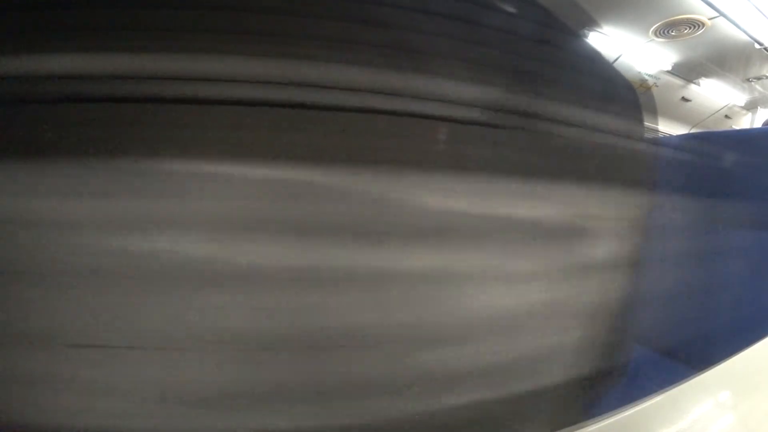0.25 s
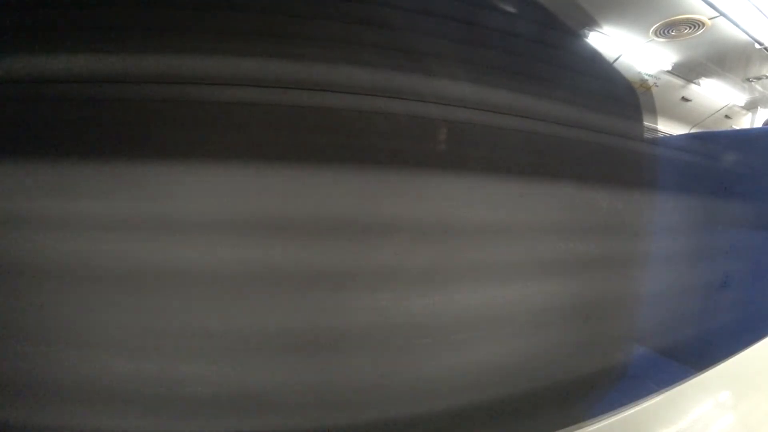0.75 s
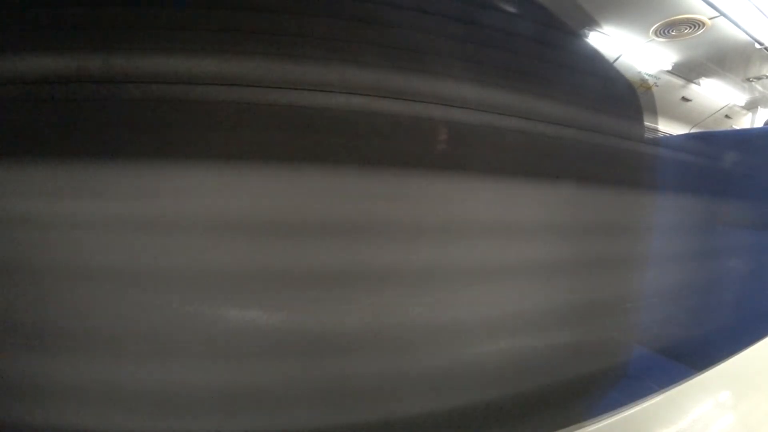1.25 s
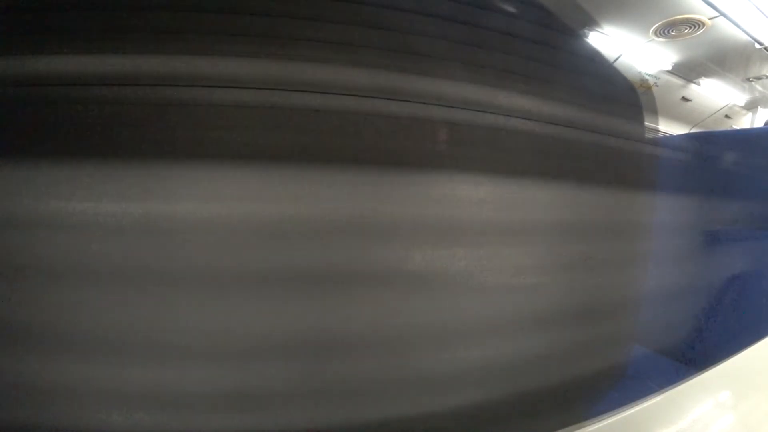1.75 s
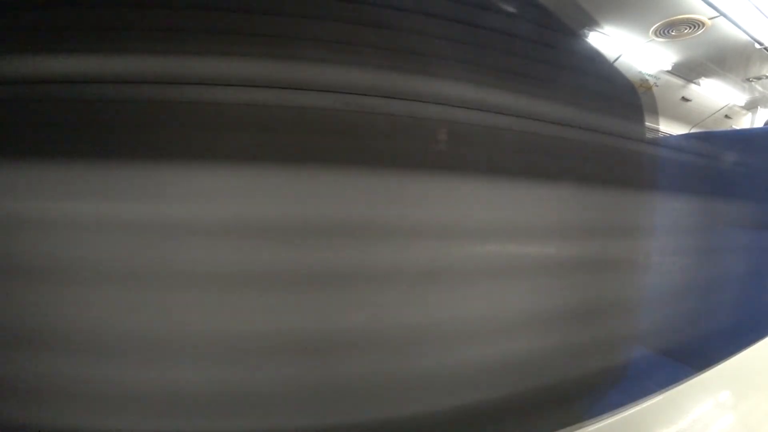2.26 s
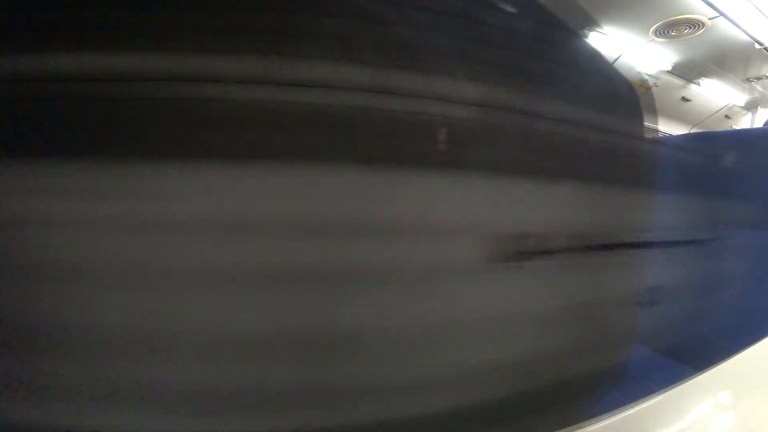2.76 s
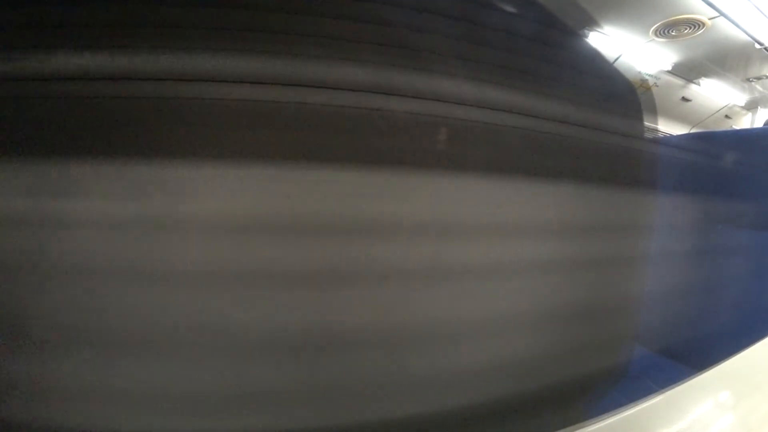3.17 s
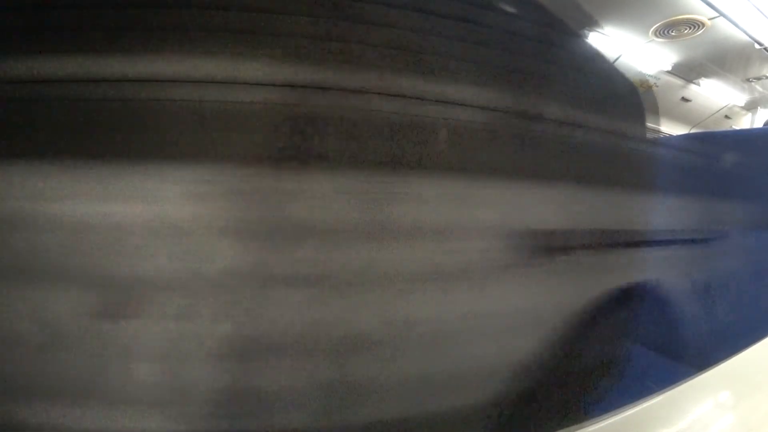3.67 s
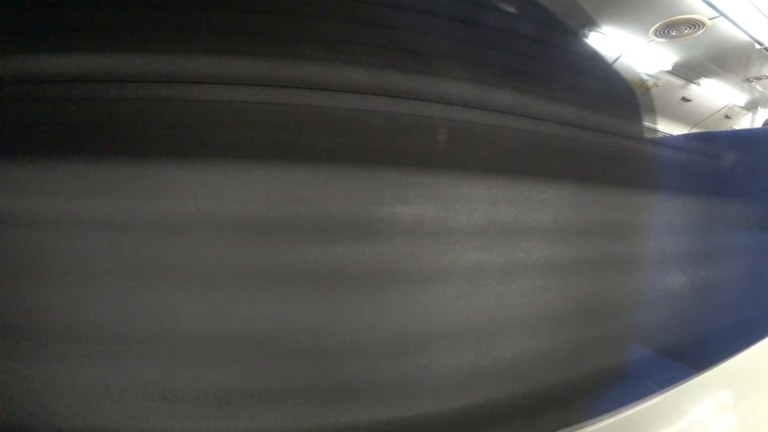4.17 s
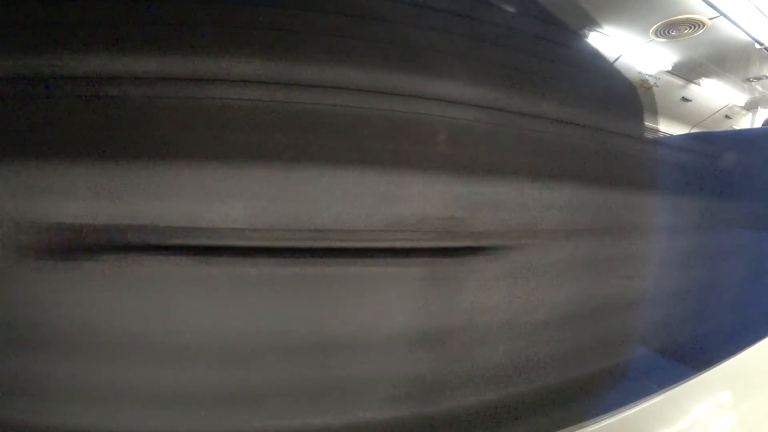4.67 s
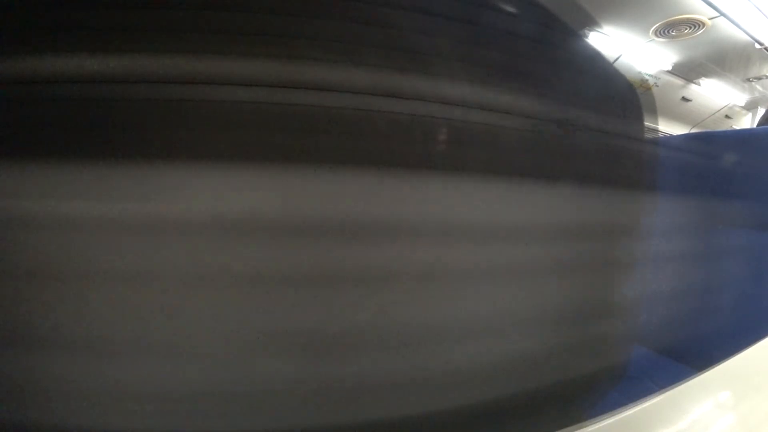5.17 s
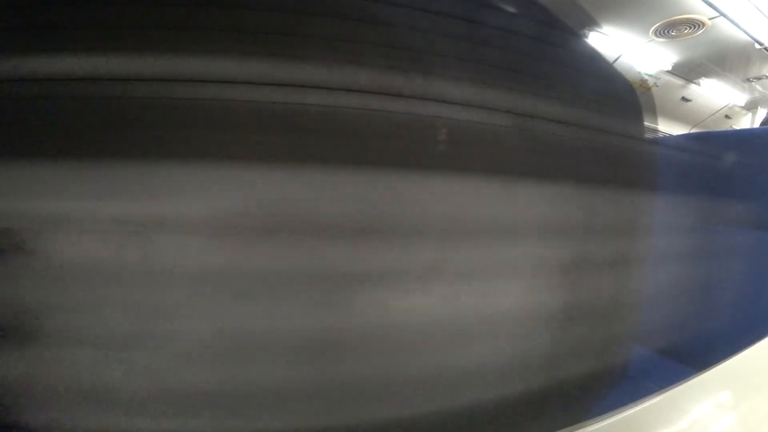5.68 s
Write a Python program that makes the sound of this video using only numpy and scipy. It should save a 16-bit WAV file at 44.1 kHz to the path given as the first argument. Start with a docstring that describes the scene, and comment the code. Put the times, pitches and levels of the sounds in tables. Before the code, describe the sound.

Steady railcar cabin noise beside a window as the tunnel wall rushes past: very low uneven heaving, boomy cabin air, a low engine hum, and broad rushing wheel noise. A thin metallic gear whine fades in and out, shifting between left and right. Faint hiss and a barely perceptible whistle lie above, all continuous from start to finish.

```python
"""Diesel railcar in a tunnel

Inside a railcar that slowly gains speed: a six-cylinder engine drones under the floor as a stack of sines,
and gears whine as sines with shaft sidebands. The turbocharger's faint whistle is a narrow band of noise.
Shaped noise makes the car body's heave and boom, the wheels' roar that comes back off the tunnel wall through
the window, the air hiss and brief flickers of treble. Two microphones close together pick it all up."""
import sys
import numpy as np
from scipy import signal
from scipy.fft import rfft, irfft, next_fast_len
from scipy.io import wavfile
from scipy.ndimage import uniform_filter1d

SR = 44100
rng = np.random.default_rng(int(sys.argv[2]) if len(sys.argv) > 2 else 0)


def wav_out(sig):
    """Save sig, one row per channel (or a flat mono array), as 16-bit PCM at SR to the path in sys.argv[1]."""
    wavfile.write(sys.argv[1], SR, np.round(np.clip(np.atleast_2d(sig).T, -1, 1) * 32767).astype(np.int16))


N = 261513  # length in samples

# Engine cycles a second, one cycle being two crank turns: start_s, cycle_hz
ENGINE_CYCLE = [(0, 15.445), (5.93, 15.69)]
# Engine lines, levels at mid-scene; the sixth multiple is the firing rate:
# multiple of the cycle, left_db, right_db, drift_db_per_s
ENGINE_ORDERS = [(4, -42, -41, -.3), (5, -38, -38, .3), (6, -28, -29, -.3), (7, -49, -50, 2),
                 (9, -44, -46, 2), (10, -49, -52, -.5), (11, -44, -49, 1.9), (12, -42, -41, .7),
                 (13, -51, -54, .4), (14, -43, -47, .4), (15, -50, -49, .3), (17, -55, -50, -1.2),
                 (18, -64, -52, -1.2), (21, -52, -59, .8), (22, -55, -53, .6), (23, -59, -51, 1.3),
                 (24, -66, -54, .5), (25, -51, -49, -.7), (26, -50, -50, 3.3), (28, -56, -51, 1.2),
                 (32, -59, -54, .7), (33, -56, -54, 1.1), (35, -47, -57, -.1), (36, -62, -50, 1.4),
                 (37, -55, -50, .2), (38, -51, -54, -.6), (42, -56, -52, 1.6), (44, -56, -57, 2.1),
                 (45, -62, -55, 0), (60, -61, -56, -.8)]
# Phase by which the left leads on engine lines; low ones arrive together: line_hz, lead_rad
ENGINE_LEAD = [(100, 0), (140, -.9), (520, -.8), (540, -2.6)]

# Driveline tones, pitch at the starting speed and levels at mid-scene:
# pitch_hz, left_db, right_db, sideband_db (against the tone), drift_db_per_s, left_lead_rad
GEAR_TONES = [(34.4, -31, -30, -60, 0, 0), (220, -52, -47, -60, .6, -1.7), (311.5, -45, -50, -60, -.8, 0),
              (439.7, -63, -52, -60, -1, -2.9), (1088.3, -59, -49, -10, .3, 2.4),
              (1133.6, -62, -57, -60, 1, -3), (1482.6, -57, -56, -16, .3, .8),
              (1523.6, -56, -56, -11, .4, -1.5), (2176.6, -57, -54, -8, .3, 2)]
# The loudest gear mesh fades in and out at each microphone: start_s, left_db, right_db
WHINE_LEVELS = [(0, -49, -48), (.45, -60, -43), (.9, -52, -41), (1.4, -48, -38), (1.8, -52, -47.5),
                (2.35, -45.5, -48), (2.75, -43.5, -67), (3.15, -47.5, -46.5), (3.7, -46.5, -45),
                (4.0, -43, -50), (4.5, -48, -49), (4.85, -48, -49), (5.45, -64, -47), (5.93, -50, -41)]
SHAFT_HZ, WHINE_HZ = 34.4, 1770.6  # drive shaft turns a second and loudest mesh, at the starting speed
# the left's lead on the whine at the start, and its growth per second of starting-speed running
WHINE_LEAD_RAD, WHINE_TURN_RAD_PER_S = -4.5, 1.17

# Compressor whistle: start_s, pitch_hz
TURBO_PITCH = [(0, 10480), (5.93, 10570)]
TURBO_DB, TURBO_FADES_DB_PER_S = -66.5, 0.5  # level at the start and its slow fall
FLUTTER_HZ = 80  # corner of the noise that spreads the whistle

# Heave of the car body: start_s, level_db
HEAVE_LEVEL = [(0, -18), (.3, -19), (.6, -17), (.9, -18), (1.35, -24), (1.6, -14), (2.05, -18.5),
               (2.55, -15), (2.95, -19), (3.5, -13), (3.9, -20), (4.45, -20), (5.05, -16.5), (5.2, -16),
               (5.45, -16), (5.93, -16.5)]
# Body bending and suspension resonances: centre_hz, width_hz, relative level_db
HEAVE_MODES = [(8, 4, 0), (14, 4, -3), (20.7, 4, 2), (28, 6, -5.5)]
# Relative spectrum of the cabin boom: freq_hz, level_db (per Hz)
BOOM_SPECTRUM = [(30, -30), (38, -3), (50, -4), (62, -1), (78, 0), (88, -7), (100, -13), (120, -30),
                 (200, -100)]
BOOM_DB, BOOM_SINKS_DB_PER_S = -24, 1  # level at the start and its slow fall

# Wheels on rails, levels before each layer's trim: start_s, low_roar_db, high_roar_db
ROLLING_LEVELS = [(0, -31, -37.5), (2, -30, -37), (4, -30, -37), (5.93, -31.5, -36.5)]
# Relative spectra of the two roars: freq_hz, level_db (per Hz)
LOW_ROAR_SPECTRUM = [(50, -88), (80, 2), (100, -5), (130, -0.5), (160, 0), (200, -4.5), (280, -7.5),
                     (400, -8.5), (500, -9.5), (600, -9.5), (650, -14.5), (800, -32.5), (1000, -66),
                     (1500, -110)]
HIGH_ROAR_SPECTRUM = [(400, -90), (550, -6.5), (750, 2), (1000, 1.5), (1190, 0.5), (1280, -4.5), (1650, -4),
                      (2000, -2.5), (2500, -6.5), (3500, -8.5), (4000, -11.5), (4600, -21.5), (5200, -36),
                      (7000, -100)]
# Broad rings of wheel and rail: centre_hz, width_hz, relative level_db
WHEEL_RINGS = [(820, 25, -5), (882, 21, 5.5), (924, 28, 3.5), (1785, 17, 0.5), (2238, 77, -2.5)]
# Relative spectrum of the air past the window: freq_hz, level_db (per Hz)
HISS_SPECTRUM = [(3800, -40), (4600, -2.5), (5200, 0), (6800, -2), (8500, -6), (10000, -7.5), (11000, -8),
                 (12000, -14.5), (14000, -17), (16000, -21)]

# Brief flickers of the treble: peak_s, level_db
TREBLE_PUFFS = [(.1, -69), (1.75, -74), (2.14, -72), (3.99, -72), (4.05, -74)]

# Likeness of the noise at the two microphones: freq_hz, correlation (-1 to 1)
STEREO_LIKENESS = [(20, .995), (60, .995), (100, .975), (130, .85), (200, .62), (360, .3), (660, -.18),
                   (1210, -.07), (2200, -.11), (4020, -.04), (12000, .03)]
# Tilt of the noise between the microphones: freq_hz, left_minus_right_db
STEREO_LEAN = [(20, -1.3), (40, -.9), (65, -.1), (150, 2), (240, -.5), (390, -2), (620, -2.6), (990, -4),
               (1580, -2.8), (2520, -2.5), (4020, -1.5), (9000, 0)]
TOP_HZ = 15750  # recorder's band limit


def amp(db):
    """Gain of a level in dB."""
    return 10 ** (np.asarray(db) / 20)


def unit(x):
    """x at rms 1."""
    return x / np.sqrt(np.mean(x ** 2) + 1e-20)


def along(points, hz):
    """Read (Hz, value) points on a log frequency axis."""
    f, v = np.transpose(points)
    return np.interp(np.log(hz + 1), np.log(f + 1), v)


def curves(rows):
    """Draw each column after the time as an automation curve, one value per sample."""
    s, *cols = np.transpose(rows)
    return np.array([np.interp(np.arange(N) / SR, s, c) for c in cols])


def wobble(rate):
    """A random curve for each channel: straight lines between rate knots a second."""
    knots = rng.standard_normal((2, 400))
    return np.array([np.interp(np.arange(N) * rate / SR, np.arange(400), k) for k in knots])


def waver(rate, hz):
    """Level wobble of a tone: long waves waver alike at both microphones, short ones apart."""
    both = wobble(rate)
    return both[0] + min(hz / 250, 1) * (both - both[0])


def filtered(x, response):
    """Shape x by a gain that depends on frequency."""
    m = next_fast_len(N + SR // 2)
    freqs = np.fft.rfftfreq(m, 1 / SR)
    return irfft(rfft(x, m) * response(freqs), m)[..., :N]


def modes(table):
    """Gain over frequency of resonances that add in power."""
    def gain(f):
        power = 0
        for centre, width, db in table:
            damping = (f * width) ** 2
            power = power + amp(2 * db) * damping / ((centre ** 2 - f * f) ** 2 + damping)
        return np.sqrt(power)
    return gain


def spectrum(points):
    """Gain over frequency of (Hz, dB) points."""
    return lambda f: amp(along(points, f))


def rush(colour, patchy_db=0):
    """Coloured stereo noise with random patches of gain, at rms 1 in the mid signal."""
    z = signal.stft(rng.standard_normal((2, N)), nperseg=512)[2]
    # patches some 500 Hz tall and 80 ms long
    field = uniform_filter1d(rng.standard_normal(z.shape[1:]), size=6, axis=0)
    field = uniform_filter1d(field, size=14, axis=1)
    pair = signal.istft(z * amp(patchy_db * unit(field)), nperseg=512)[1][:, :N]

    def mid_side(hz):
        # the angle between mid and side sets the left-right correlation
        angle = np.arccos(np.clip(along(STEREO_LIKENESS, hz), -1, 1)) / 2
        return colour(hz) * [np.cos(angle), np.sin(angle)]

    mid, side = filtered(pair, mid_side)
    left_right = np.array([mid + side, mid - side])
    both = filtered(left_right, lambda hz: amp(np.outer([.5, -.5], along(STEREO_LEAN, hz))))
    return both / np.sqrt(np.mean(both.mean(axis=0) ** 2))


def steady(x, window_s, share):
    """Even out part of x's chance swells, so that it follows a given level."""
    size = int(window_s * SR)
    power = uniform_filter1d(uniform_filter1d(x.mean(axis=0) ** 2, size), size)
    even = x / (np.abs(power) + .03) ** (share / 2)
    return even / np.std(even.mean(axis=0))


def tone(cycles, lead):
    """A sine of rms 1 whose phase at the left microphone is lead radians ahead."""
    phase = 2 * np.pi * (cycles + rng.uniform())
    return np.sqrt(2) * np.sin(phase + np.outer([.5, -.5], lead))


def engine():
    """Unequal cylinders put lines on multiples of the cycle; each swells at random, the higher ones more."""
    cycles = np.cumsum(curves(ENGINE_CYCLE)[0]) / SR
    from_middle_s = (np.arange(N) - N / 2) / SR
    out = np.zeros((2, N))
    for k, left_db, right_db, drift in ENGINE_ORDERS:
        start_hz = k * ENGINE_CYCLE[0][1]
        waver_db = min(.1 * k, 2.5) * waver(1.8, start_hz)
        level = amp(np.array([[left_db], [right_db]]) + drift * from_middle_s + waver_db)
        out += level * tone(k * cycles, along(ENGINE_LEAD, start_hz))
    return out


def driveline():
    """Gear tones rise with the engine; an uneven shaft swells each mesh once a turn, which makes sidebands."""
    speed = curves(ENGINE_CYCLE)[0]
    from_middle_s = (np.arange(N) - N / 2) / SR
    seconds = np.cumsum(speed / speed[0]) / SR  # running time at the starting speed
    shaft = 2 * np.cos(2 * np.pi * SHAFT_HZ * seconds)

    whine_level = amp(curves(WHINE_LEVELS) + 1.1 * wobble(9))
    whine_lead = WHINE_LEAD_RAD + WHINE_TURN_RAD_PER_S * seconds
    out = whine_level * (1 + amp(-12) * shaft) * tone(WHINE_HZ * seconds, whine_lead)

    for hz, left_db, right_db, side_db, drift, lead in GEAR_TONES:
        level = amp(np.array([[left_db], [right_db]]) + drift * from_middle_s + 3 * waver(2.5, hz))
        out += level * (1 + amp(side_db) * shaft) * tone(hz * seconds, lead)
    return out


def turbo():
    """A whistle whose pitch flutters too fast to be heard as anything but a narrow hiss."""
    flutter = filtered(rng.standard_normal((4, N)), lambda f: 1 / (1 + (f / FLUTTER_HZ) ** 2) ** .6)
    a, b = flutter.reshape(2, 2, N)
    phase = 2 * np.pi * np.cumsum(curves(TURBO_PITCH)[0]) / SR
    whistle = unit(a * np.cos(phase) + b * np.sin(phase))
    level_db = TURBO_DB - TURBO_FADES_DB_PER_S * np.arange(N) / SR + 1.7 * wobble(2.6)
    return amp(level_db) * whistle


def body():
    """Track unevenness shakes the lowest modes of the car; the cabin air booms above them in chance lumps."""
    heave_db, = curves(HEAVE_LEVEL)
    boom_db = BOOM_DB - BOOM_SINKS_DB_PER_S * np.arange(N) / SR

    def sprung(hz):
        # the suspension holds back faster shaking
        return modes(HEAVE_MODES)(hz) / (1 + (hz / 45) ** 4)

    heave = steady(rush(sprung), window_s=.15, share=.7)
    boom = steady(rush(spectrum(BOOM_SPECTRUM)), window_s=.35, share=.5)
    return amp(heave_db) * heave + amp(boom_db) * boom


def rolling():
    """Wheel and rail roughness, smeared to an even roar by the tunnel, and the air that streams past."""
    low_db, high_db = curves(ROLLING_LEVELS)
    low = amp(low_db - 2.5) * rush(spectrum(LOW_ROAR_SPECTRUM), patchy_db=.4)
    high = amp(high_db - 1.5) * rush(spectrum(HIGH_ROAR_SPECTRUM), patchy_db=.5)
    rings = amp(high_db - 8) * rush(modes(WHEEL_RINGS), patchy_db=.8)
    soft_rings = filtered(rings, lambda hz: 1 / (1 + (hz / 3200) ** 6))
    hiss = amp(-61.5) * rush(spectrum(HISS_SPECTRUM), patchy_db=.9)
    return low + high + soft_rings + hiss


def puffs():
    """Short, faint swells of the highest treble: noise under bell-shaped envelopes."""
    t = np.arange(N) / SR
    swell = sum(amp(db) * np.exp(-((t - s) / .025) ** 2) for s, db in TREBLE_PUFFS)
    return swell * rush(spectrum([(7000, -60), (9500, -4), (12000, 0), (16000, -6)]))


def scene():
    """All sources as they reach the two microphones."""
    return engine() + driveline() + turbo() + body() + rolling() + puffs()


def record(dry):
    """The recorder keeps nothing above its band limit."""
    return filtered(dry, lambda hz: hz < TOP_HZ)


dry = scene()
out = record(dry)
wav_out(out)
```